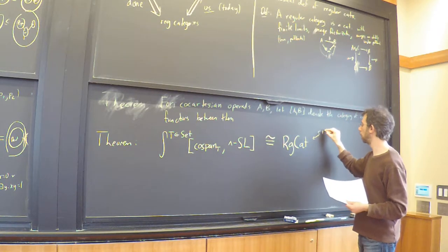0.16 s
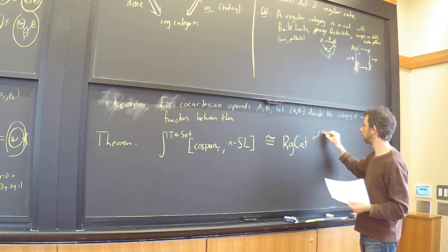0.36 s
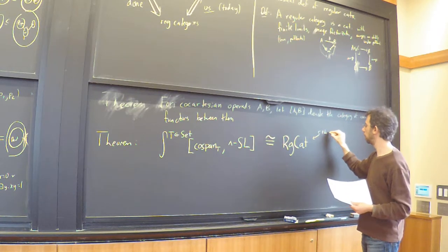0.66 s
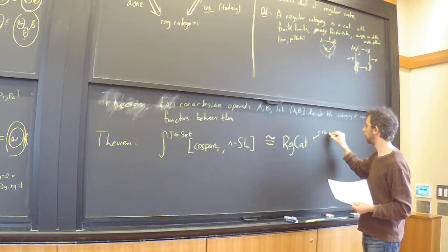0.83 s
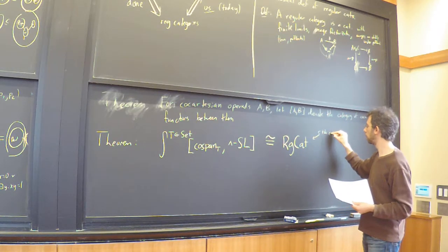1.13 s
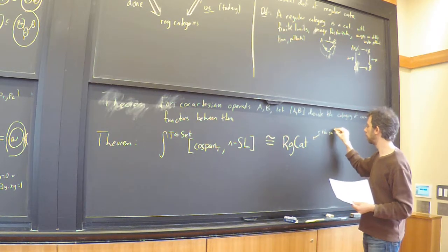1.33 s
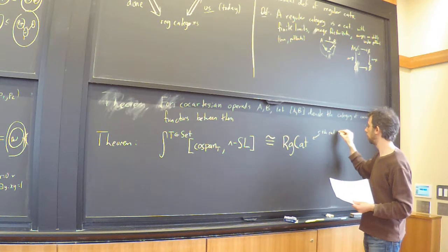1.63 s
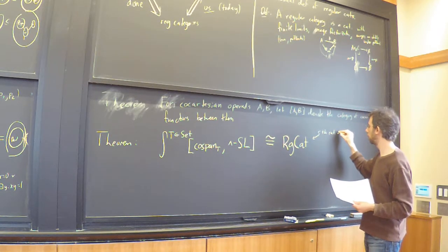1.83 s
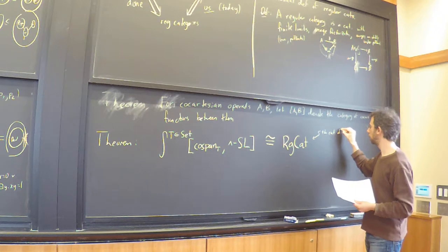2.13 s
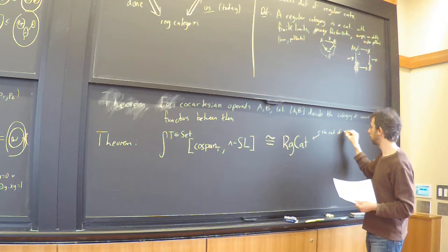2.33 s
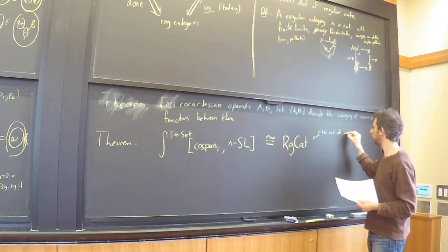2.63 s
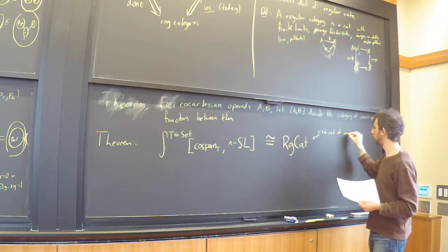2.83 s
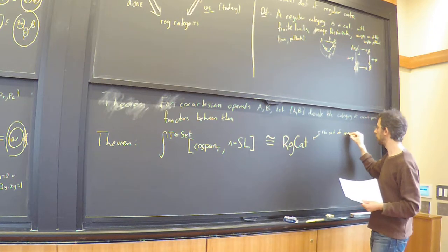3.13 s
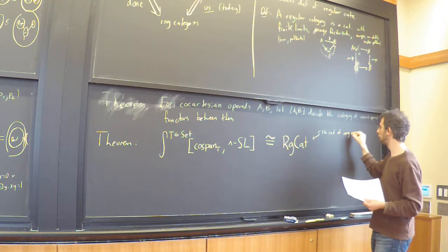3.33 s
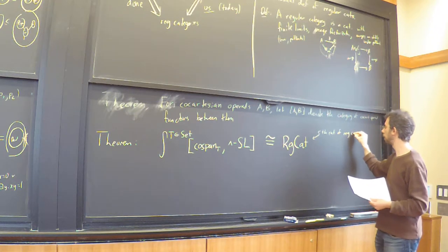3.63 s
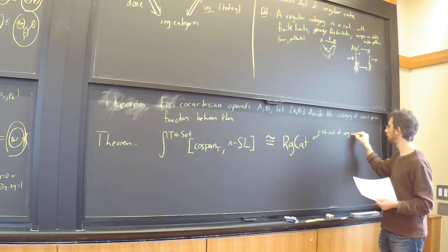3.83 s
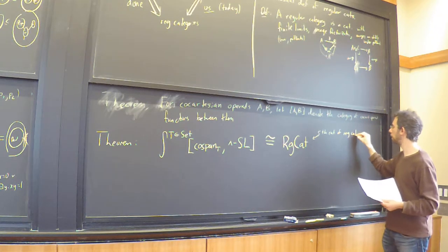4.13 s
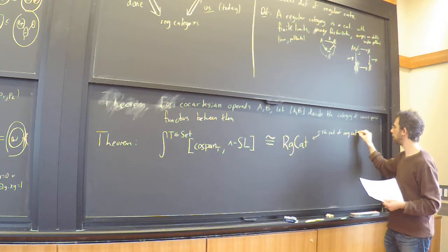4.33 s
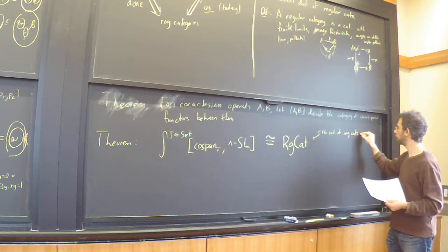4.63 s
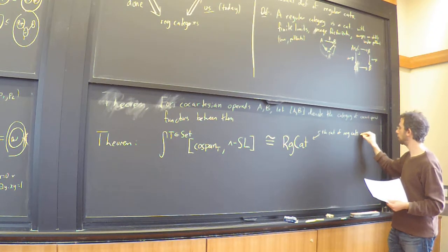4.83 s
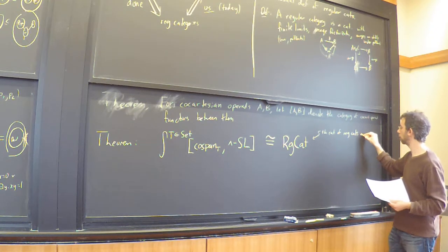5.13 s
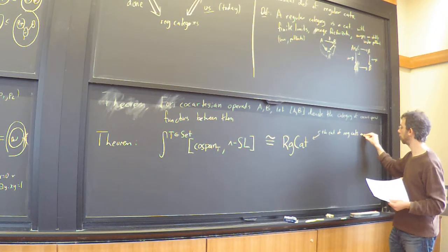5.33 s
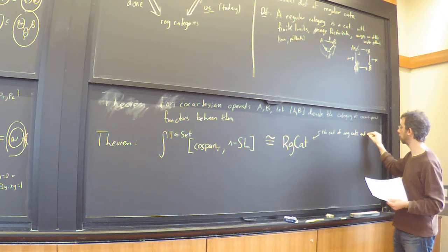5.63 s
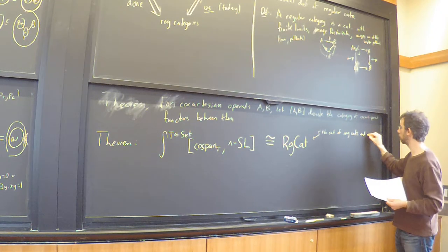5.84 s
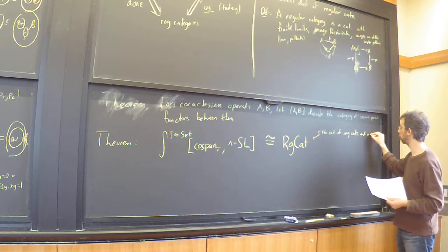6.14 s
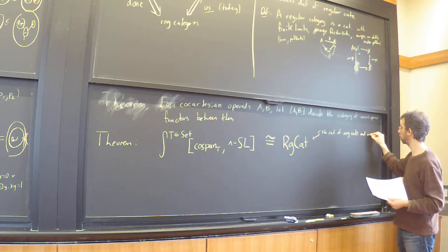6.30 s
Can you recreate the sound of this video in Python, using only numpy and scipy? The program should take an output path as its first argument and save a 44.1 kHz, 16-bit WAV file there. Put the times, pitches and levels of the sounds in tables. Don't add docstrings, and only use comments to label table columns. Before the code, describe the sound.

Someone writes on a blackboard: crisp chalk clicks and faint scrapes, a sharp bench knock late on, soft fan rumble and short room echo.

```python
import sys
import numpy as np
from scipy import signal
from scipy.fft import rfft, irfft
from scipy.io import wavfile
from scipy.ndimage import uniform_filter1d

SR = 44100
rng = np.random.default_rng(int(sys.argv[2]) if len(sys.argv) > 2 else 0)


def amplitude_ratio(level_db):
    exponent = np.asarray(level_db, float) / 20
    return 10 ** exponent


def store_wav(level_fs):
    pcm = np.round(np.clip(np.atleast_2d(level_fs), -1, 1) * 32767)
    wavfile.write(sys.argv[1], SR, pcm.T.astype(np.int16))


N = 285194
RING_LAG_S = 0.00115
USUAL_TAP_DB = -18


def tap(db, hz, click_db):
    # (frequency over ring frequency [ratio], density [dB per Hz])
    blow_colour = [(.06, -30.5), (.13, -18.5), (.2, -11.5), (.4, -6.5), (.6, -3.5), (1.0, 3), (1.4, -3),
                   (2.0, -9.5), (2.6, -19), (4.0, -23.5), (8.0, -48)]
    # (frequency [Hz], level [dB])
    slate_modes = [(650, -19.5), (1640, -3), (2400, -8), (3100, -18.5)]
    # (frequency [Hz], density [dB per Hz])
    tick_colour = [(2500, -31), (4000, 19), (6000, -7), (8800, 9.5), (12000, 1), (16000, -9)]
    swing_t60_s, modes_t60_s, shiver_t60_s, grit_t60_s = 0.003, 0.014, 0.048, 0.0059
    bite_hz, bite_per_db = 3340, 0.5
    size = 2048
    harder_db = np.clip(db - USUAL_TAP_DB, -8, 8)
    thud_db = -7 - 0.27 * harder_db
    colour_hz = np.sqrt(hz * slate_modes[1][0])

    def blow_db(f):
        low = (thud_db + 13) * np.clip(1.5 - f / 600, 0, 1)
        bite = bite_per_db * harder_db / (1 + ((f - bite_hz) / 1100) ** 2)
        return along(blow_colour, f / colour_hz) + low + bite

    blow = np.pad(causal(blow_db), (0, 1024))
    tick = amplitude_ratio(click_db) * np.pad(causal(lambda f: along(tick_colour, f)), (0, 1024))

    pulse = ring([(hz, 0, swing_t60_s)], size)
    swing = np.convolve(pulse, pulse)[:size]
    swing = swing / np.abs(swing).max()
    modes = [(f * (1 + 0.042 * rng.standard_normal()), g, modes_t60_s) for f, g in slate_modes]
    swing = swing - ring(modes, size) * (1 - np.exp(-np.arange(size) / 30))

    shiver = np.convolve(burst(shiver_t60_s), blow)[:size] * amplitude_ratio(-15.5)
    grit = np.convolve(burst(grit_t60_s), tick)[:size] * amplitude_ratio(-12)
    first = tick * amplitude_ratio(-1.5) + grit - amplitude_ratio(-8) * blow + shiver * amplitude_ratio(-16.5)
    late = np.pad(swing + shiver + grit * amplitude_ratio(-18), (int(RING_LAG_S * SR), 0))[:size]
    spread = blow + np.roll(tick, 200) * amplitude_ratio(-6.5)
    return amplitude_ratio(db - 1.5) * (first + late), amplitude_ratio(db + 0.5) * spread


def strokes():
    # (start [s], length [s], hiss level [dB], up-and-down swings of the hand [count])
    letters = [(0.276, 0.18, -62.5, 1.1), (0.427, 0.34, -66, 2.3), (0.825, 0.22, -63.5, 0.69),
               (1.041, 0.25, -62.5, 2.44), (1.39, 0.12, -65, 1), (1.568, 0.12, -65, 1.3),
               (1.764, 0.17, -65.5, 1), (2.036, 0.16, -61.5, 1.2), (2.281, 0.059, -64, 1),
               (2.508, 0.41, -67, 3.2), (2.999, 0.34, -63.5, 2.3), (3.484, 0.23, -63.5, 1.67),
               (3.685, 0.32, -64, 2), (4.11, 0.1, -59, 1.2), (4.294, 0.3, -63, 1.53),
               (4.766, 0.43, -66, 4.6), (5.863, 0.37, -66.5, 2.16), (6.263, 0.32, -67.5, 2.5)]
    # (frequency [Hz], density [dB per Hz])
    dust_colour = [(300, -11), (1500, 5.5), (4000, -4), (5200, 0), (7300, -9.5), (9500, -1), (13000, -3.5),
                   (15500, -5)]
    # (frequency [Hz], density [dB per Hz])
    line_colour = [(300, -8), (1500, 3.5), (3000, 2), (6000, 3), (9500, 1.5), (12500, -0.5), (15500, -10)]
    flicker_db, flicker_hz, slate_db = 1.3, 60, -4
    turn_share = 0.15
    t = np.arange(N) / SR
    grain_db = flicker_db * walk(flicker_hz) + 2.6 * rng.exponential(size=N)
    grains = rng.standard_normal((2, N)) * amplitude_ratio(grain_db)
    dust = level(shaped(grains[0], lambda f: amplitude_ratio(along(dust_colour, f))), 1.9)
    slate = shaped(grains[0], lambda f: 1 / np.hypot(1, (f - 1600) / 500) * np.clip(f / 900, 0, 1))
    hiss = dust + amplitude_ratio(slate_db) * level(slate, 0)
    direct = level(shaped(grains[1], lambda f: amplitude_ratio(along(line_colour, f))), 0) * long_line(t)
    for s, length, db, swings in letters:
        way = np.clip((t - s) / length, 0, 1)
        speed = np.abs(np.sin(np.pi * swings * way))
        pressure = np.sin(np.pi * way) ** 0.15 * (turn_share + (1 - turn_share) * speed)
        direct = direct + pressure * amplitude_ratio(db) * hiss
    return direct * panned(-1.4) + amplitude_ratio(-10.0) * signal.fftconvolve(room(), direct[None])[:, :N]


def long_line(t):
    start_s, attack_s, hold_s, release_s = 5.32, 0.078, 0.32, 0.1
    line_db, edge_db, sag_db_per_s = -52.5, -14, -9
    t = t - start_s
    rise = t / attack_s
    fall = (attack_s + hold_s + release_s - t) / release_s
    share = np.clip(np.minimum(rise, fall), 0, 1)
    sag_db = sag_db_per_s * np.clip(t - attack_s, 0, 1)
    return (share > 0) * amplitude_ratio(line_db + edge_db * (1 - share) + sag_db)


def knock(out):
    # (time [s], wood level [dB], crack level [dB], rattle level [dB])
    drop = [(4.4452, -32, -20, -38.5)]
    # (frequency [Hz], level [dB], t60 [s])
    wood_modes = [(239, -0.5, 0.89), (388, -20, .3), (506, 11, 0.39), (660, -16, 0.2), (791, -13, 0.5),
                  (917, 24, 0.047), (1196, 3, 0.31), (1385, 6.5, 0.27), (2020, -11, 0.11), (2250, -3, 0.32),
                  (3400, -24, 0.041)]
    # (frequency [Hz], level [dB], t60 [s])
    bench_modes = [(59.6, 11.5, 0.66), (136, -1, 0.19), (276, -4, 0.18), (433, 8.5, 0.023),
                   (603, -5, 0.065), (850, 3.5, 0.013), (1750, 1, 0.017)]
    # (frequency [Hz], density [dB per Hz])
    crack_colour = [(300, -8), (1500, 10.5), (4000, 0), (8000, -4), (12000, 1), (16000, -16)]
    # (frequency [Hz], density [dB per Hz])
    rattle_colour = [(90, -37), (220, 0), (500, -3), (1000, -13), (2000, -8), (5000, -26), (16000, -45)]
    bounce_s, thud_s, boom_s = 4.458, 0.661, 0.69
    bounce_db, thud_db, boom_db = -12, -45.5, -50.5
    s, wood_db, crack_db, rattle_db = drop[0]

    crack = causal(lambda f: along(crack_colour, f)) * amplitude_ratio(crack_db)
    struck = np.convolve(burst(0.0095, size=600), crack) / 2
    add(out, struck, s + 0.0017, pan_db=-8.5, wet_db=2.5, spread=np.pad(crack, (0, 600)))
    bounce = np.convolve(burst(0.027, size=1500), crack) * amplitude_ratio(bounce_db) / 2
    add(out, bounce, bounce_s, pan_db=0.0, wet_db=-7)

    wood = ring([(hz, db, 0.28 * t60) for hz, db, t60 in wood_modes])
    wood = wood * (1 - np.exp(-np.arange(16384) / 130))
    shaking = burst(0.14, size=12000) * (1 - np.exp(-np.arange(12000) / 120))
    rattle = np.convolve(shaking, causal(lambda f: along(rattle_colour, f)))
    rattle = np.pad(rattle, (0, 16384 - len(rattle)))
    add(out, amplitude_ratio(wood_db) * wood + amplitude_ratio(rattle_db) * rattle, s, pan_db=-5.5, wet_db=-9)

    thud = np.convolve(ring(bench_modes[1:], size=8192), push(0.00021))
    add(out, amplitude_ratio(thud_db) * thud, thud_s, pan_db=-11.0, wet_db=-2.5)
    boom = np.convolve(ring(bench_modes[:1]), np.hanning(900) / 450)
    add(out, amplitude_ratio(boom_db) * boom, boom_s, pan_db=-21.0, wet_db=-4)
    return out


def room(size=18000):
    # (delay [s], level [dB])
    reflections = [(.0052, -13.5), (0.028, -3), (.038, -2.5), (.047, -12.5), (0.084, -27.5)]
    # (band centre [Hz], t60 [s], level [dB])
    tail_bands = [(228, 0.67, -2), (467, 0.34, 5.5), (920, 0.36, 9), (1800, 0.44, 2), (3000, 0.42, 4),
                  (4440, 0.37, 4.5), (7050, 0.42, 4.5), (11900, 0.3, 4.5)]
    tail_db, likeness = -28.5, 0.62
    echo_jitter_s, echo_scatter_db = 0.00033, 3
    t, hz = np.arange(size) / SR, np.arange(size // 2 + 1) * SR / size
    mid, side = rfft(rng.standard_normal((2, size)))
    mid = mid * np.sqrt((1 + likeness) / 2)
    side = side * np.sqrt((1 - likeness) / 2)
    centres, t60, db = np.transpose(tail_bands)
    shares = np.array([along(list(zip(centres, one)), hz) for one in np.eye(len(centres))])
    fades = amplitude_ratio(tail_db + db[:, None] - 60 * t / t60[:, None]) * (1 - np.exp(-t / 0.00076))
    tail = np.array([(irfft(shares * ear, size) * fades).sum(axis=0) for ear in (mid + side, mid - side)])
    for s, echo_db in reflections:
        i = int((s + echo_jitter_s * rng.standard_normal()) * SR)
        tail[:, i:i + 199] += push(0.00047) * amplitude_ratio(echo_db + echo_scatter_db * rng.standard_normal((2, 1)))
    return tail


def add(out, sound, s, pan_db=-1.5, wet_db=0., spread=None):
    source = sound if spread is None else spread
    heard = signal.fftconvolve(room() * amplitude_ratio(wet_db) * panned(-0.3), source[None])
    heard[:, :len(sound)] += sound * panned(pan_db)
    i = int(s * SR)
    heard = heard[:, max(-i, 0):N - i]
    out[:, max(i, 0):max(i, 0) + heard.shape[1]] += heard


def air():
    # (frequency [Hz], density [dB per Hz])
    air_colour = [(12, -44), (20, 6.5), (70, -6.5), (120, -0.5), (193, 2), (255, -1), (897, -6),
                  (1220, -12.5), (1760, -12.5), (7110, -25.5), (13200, -24), (14700, -29), (16000, -66)]
    # (frequency [Hz], left-right correlation [-1 to 1])
    air_likeness = [(30, -0.11), (60, 0.063), (130, 0.65), (1500, 0.4), (4000, 0.55), (10000, -0.087)]
    # (frequency [Hz], width [Hz], level [dB])
    fan_hums = [(55.6, 9.9, -70), (94.5, 2.9, -71), (129.8, 65, -65.5), (205.1, 5.3, -68.5)]
    noise = pair(N, lambda f: along(air_likeness, f))
    bed = level(shaped(noise, lambda f: amplitude_ratio(along(air_colour, f))), -54.5)
    for hz, width_hz, db in fan_hums:
        hum = shaped(noise, lambda f: 1 / (1 + (2 * (f - hz) / width_hz) ** 2))
        bed = bed + level(hum, db) * amplitude_ratio(1.4 * walk(8.1))
    return bed


def along(table, hz):
    x, y = np.transpose(table)
    return np.interp(np.log(hz + 0.0013), np.log(x), y)


def shaped(x, gain):
    n = x.shape[-1]
    return irfft(rfft(x) * gain(np.arange(n // 2 + 1) * SR / n), n)


def causal(db_at, size=1024):
    c = irfft(db_at(np.arange(size // 2 + 1) * SR / size) * np.log(10) / 20, size)
    c[1:size // 2] *= 2
    c[size // 2 + 1:] = 0
    response = irfft(np.exp(rfft(c)), size)
    return response / np.abs(response).max()


def level(x, db):
    return x * amplitude_ratio(db) / np.sqrt(np.mean(x ** 2))


def panned(db):
    return amplitude_ratio(np.array([[db], [-db]]) / 2)


def pair(size, likeness):
    mid, side = rng.standard_normal((2, size))
    mid = shaped(mid, lambda hz: np.sqrt((1 + np.clip(likeness(hz), -1, 1)) / 2))
    side = shaped(side, lambda hz: np.sqrt((1 - np.clip(likeness(hz), -1, 1)) / 2))
    return np.array([mid + side, mid - side])


def walk(rate):
    k = int(SR / rate)
    steps = np.repeat(rng.standard_normal(N // k + 1), k)
    return 1.3 * uniform_filter1d(uniform_filter1d(steps, k), k)[:N]


def ring(modes, size=16384):
    t = np.arange(size) / SR
    return sum(amplitude_ratio(db - 60 * t / t60) * np.sin(2 * np.pi * hz * t) for hz, db, t60 in modes)


def burst(t60, size=2048):
    return rng.standard_normal(size) * amplitude_ratio(-60 * np.arange(size) / SR / t60)


def push(seconds):
    force = np.sin(np.pi * np.clip(np.arange(1, 200) / SR / seconds, 0, 1))
    return force / force.sum()


def scene():
    # (main swing [s], level [dB], ring [Hz], click level [dB])
    landings = [(0.1194, -12.5, 1680, -7.5), (0.2622, -26.5, 1720, -21), (0.8117, -18, 1540, -19),
                (1.0009, -25, 1463, -28), (1.3613, -16, 2000, -15), (1.5546, -17.5, 1500, -23),
                (1.731, -17.5, 1640, -17.5), (1.98, -28.5, 1570, -24), (2.2619, -14.5, 1750, -17.5),
                (2.4156, -16.5, 1770, -11.5), (2.9763, -17.5, 1460, -16.5), (3.4563, -15.5, 1750, -15),
                (3.6709, -21, 1420, -21), (4.0839, -14.5, 1970, -12), (4.2917, -17, 1610, -19),
                (4.7292, -22.5, 1840, -15), (5.3215, -16.5, 1580, -14), (5.7493, -15, 1750, -9),
                (6.2488, -23, 1380, -29)]
    # (time [s], level [dB])
    skips = [(2.085, -39), (2.848, -47.5), (3.183, -44.5), (3.2, -53), (3.259, -41.5), (3.286, -42),
             (6.452, -44.5)]
    earlier = [(-0.07, -19.5)]
    out = strokes() + air()
    for s, db, hz, click_db in landings + [(s, db, 1600, -22) for s, db in earlier + skips]:
        sound, blow = tap(db, hz, click_db)
        start = s - RING_LAG_S - 1 / hz
        add(out, sound, start, pan_db=-3, wet_db=-0.1, spread=blow)
    return knock(out)


def band_limit(x):
    return signal.sosfilt(signal.butter(12, 16460, fs=SR, output="sos"), x)


def record(dry):
    low_hz, top_hz, top_db = 23, 15250, -31

    def response(f):
        return np.clip(f / low_hz, 0, 1) * amplitude_ratio(top_db * np.clip((f - top_hz) / 150, 0, 1))

    return band_limit(shaped(dry, response))


dry = scene()
out = record(dry)
store_wav(out)
```